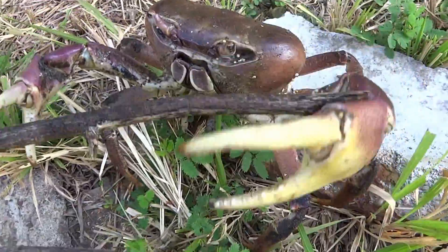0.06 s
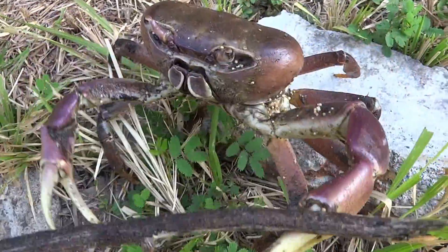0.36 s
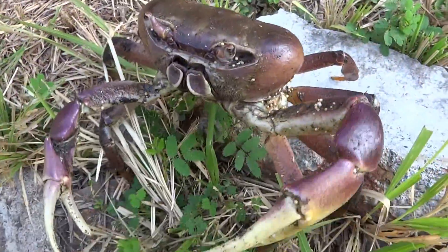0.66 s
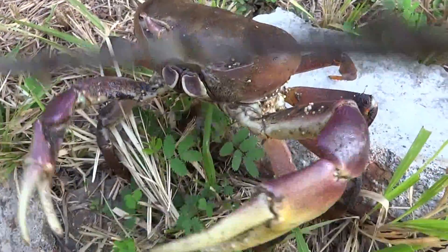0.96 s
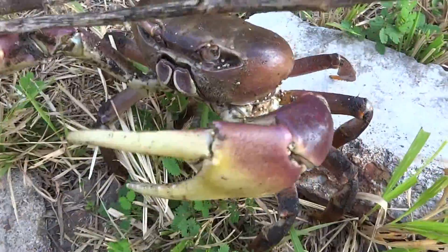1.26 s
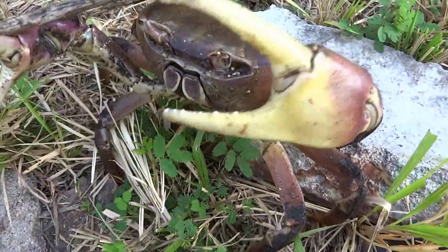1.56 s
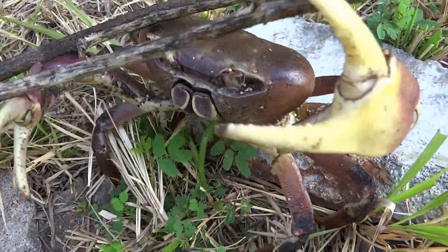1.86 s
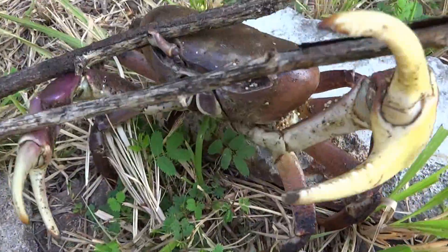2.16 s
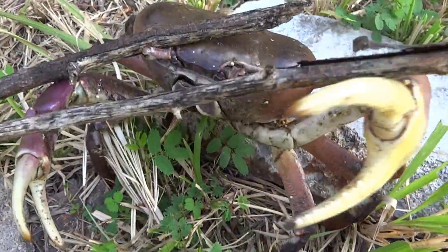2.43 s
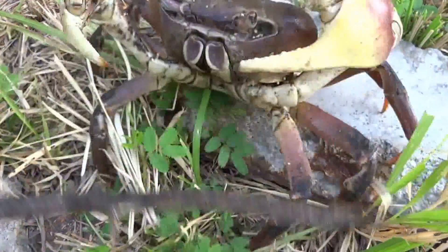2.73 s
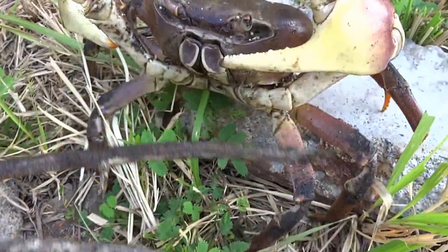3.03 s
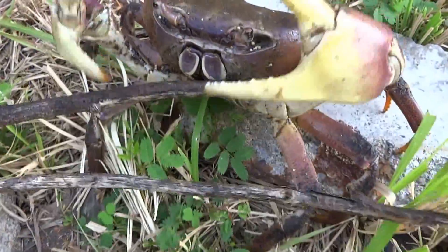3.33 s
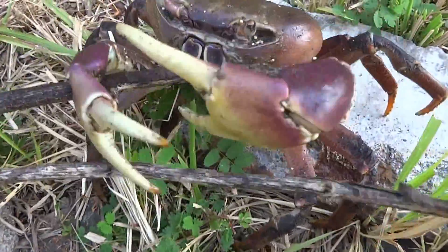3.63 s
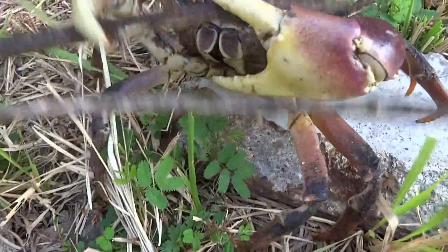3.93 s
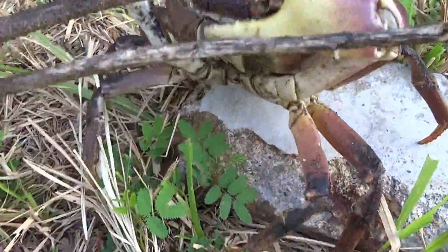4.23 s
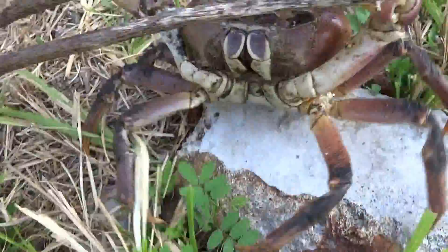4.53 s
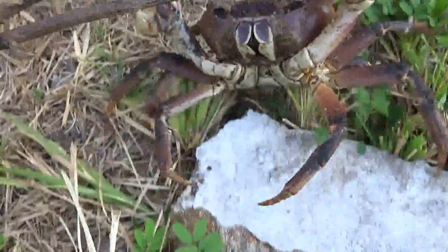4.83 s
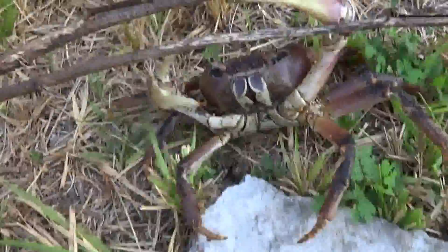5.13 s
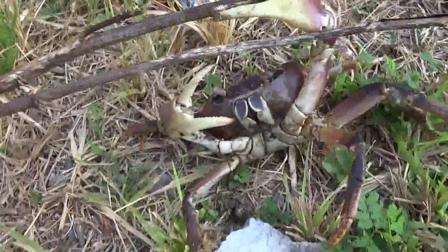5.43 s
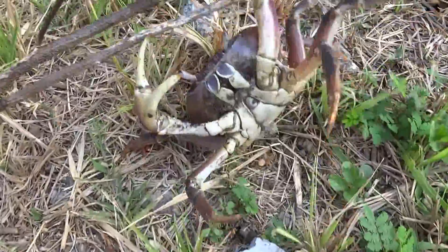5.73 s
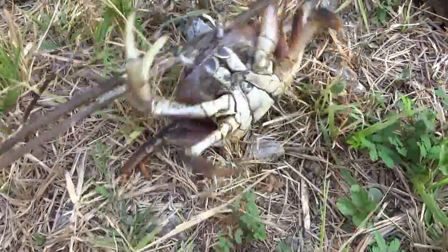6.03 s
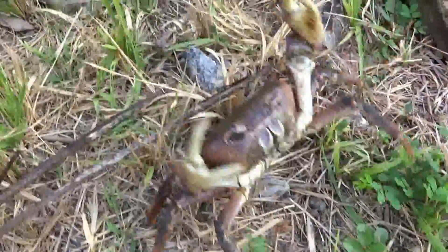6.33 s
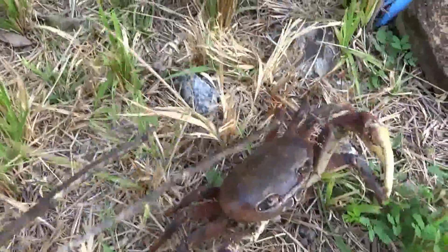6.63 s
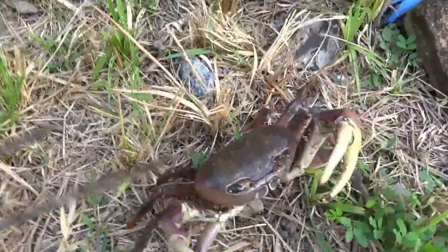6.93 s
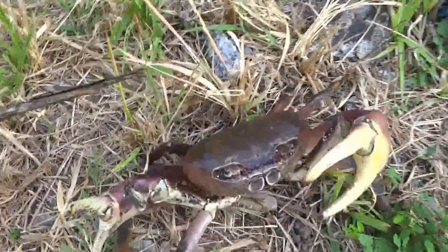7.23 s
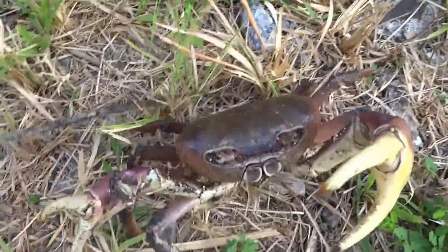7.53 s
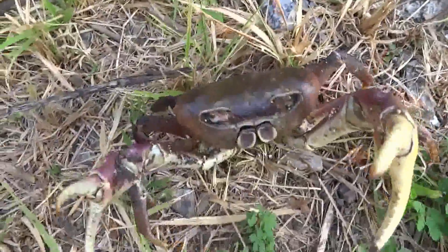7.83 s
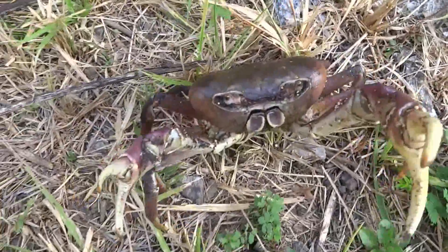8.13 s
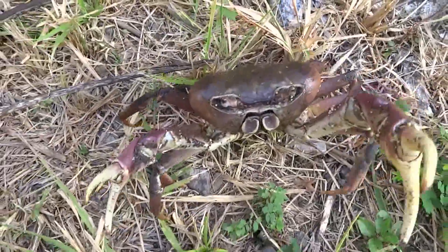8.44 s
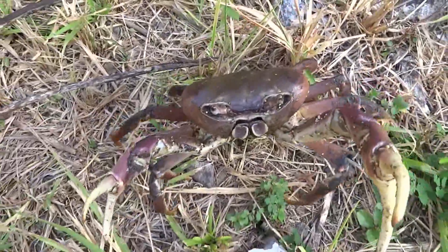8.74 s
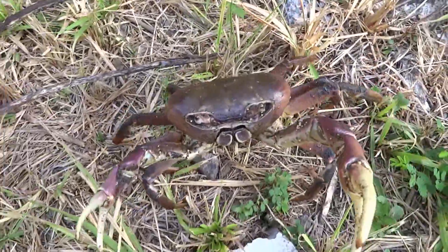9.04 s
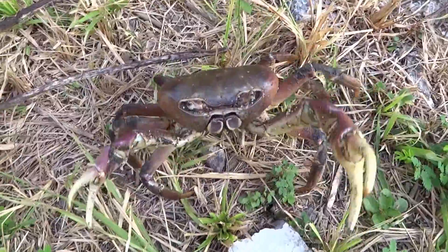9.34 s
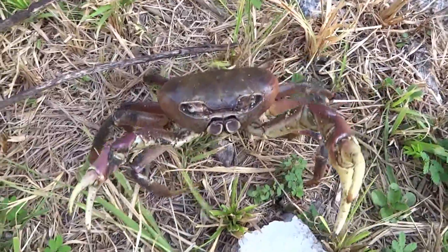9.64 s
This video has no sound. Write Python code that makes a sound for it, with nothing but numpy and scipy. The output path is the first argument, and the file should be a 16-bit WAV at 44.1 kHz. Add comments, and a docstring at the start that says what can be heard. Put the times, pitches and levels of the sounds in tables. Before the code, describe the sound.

Outdoors, close to the microphone, a large crab is prodded with sticks while a machine like a cooling unit hums and blows steadily in the background. At first there are only scattered light ticks and faint rustles. About halfway through, the crab backs away over dry grass with crisp crackles and sharp little snaps. A stick scrapes through the straw, then the rustling thins out, with one sharp clack near the end.

```python
"""Land crab retreating over dry grass

A large land crab, prodded with two sticks, backs away close to a hand-held camera. Straws crackle
under its legs by brittle fracture, a stick drags through the thatch by stick-slip friction, and
stalks, shell and wood snap and tick. Behind it drones a machine like an outdoor cooling unit:
several motors force its casing to vibrate, and its fan drives a turbulent rush of air."""
import sys
import numpy as np
from scipy import signal
from scipy.fft import rfft, irfft, next_fast_len
from scipy.io import wavfile
from scipy.ndimage import map_coordinates

SR = 44100
rng = np.random.default_rng(int(sys.argv[2]) if len(sys.argv) > 2 else 0)


def dump(signal):
    """Clip the signal to [-1, 1] and save it as 16-bit WAV at the path in sys.argv[1]."""
    limited = np.clip(np.atleast_2d(signal).T, -1, 1)
    pcm = np.round(limited * 32767).astype(np.int16)
    wavfile.write(sys.argv[1], SR, pcm)


N = 435708
TIME = np.arange(N) / SR
TOP_HZ = 15900
CATCH_S, SLIDE_OUT_S = 0.039, 0.02  # time constants: a stroke takes hold, and dies away

# The machine as heard from the moving camera. Each row: time in seconds, gain in dB.
MACHINE_GAIN = [(0, 0.5), (2.5, 0.5), (4.6, 0), (5.2, 1.5), (7, 2), (9, 2.5), (9.88, 2.2)]
# Spectrum of breaking straw. Each row: frequency in Hz, relative density in dB.
STRAW_SPECTRUM = [(1000, -28), (3000, -6), (5500, -9.5), (8000, -4), (10500, -1.5), (13500, 0.5),
                  (15000, -7), (16000, -8)]
# Stick or shell sliding on the ground. Each row: start and length in seconds, relative level in dB.
STROKES = [(1.222, 0.068, -54), (2.62, 0.065, -51.5), (3.94, 0.067, -53), (4.78, .14, -52), (5.2, .12, -52),
           (5.63, 0.15, -49), (6.03, 0.084, -47.5), (6.44, 0.076, -51), (6.76, .2, -44.5),
           (6.84, 0.053, -43.5), (6.997, 0.34, -49.5), (7.417, .18, -37.5), (7.616, 0.078, -49)]


def amp(db):
    """Amplitude ratio for a level in decibels."""
    return 10 ** (np.asarray(db) / 20)


def unit(x):
    """Normalisation to rms 1."""
    return x / np.sqrt(np.mean(x ** 2) + 1e-20)


def curve(rows):
    """Linear interpolation of (seconds, value) rows at every sample."""
    return np.interp(TIME, *np.transpose(rows))


def wobble(rate):
    """Smooth random modulation: a spline through rate knots a second."""
    knots = rng.standard_normal(int(N * rate / SR) + 4)
    coarse = map_coordinates(knots, [TIME[::64] * rate])
    return np.interp(TIME, TIME[::64], coarse)


def gain_at(spectrum, hz):
    """Gain of a (Hz, dB) spectrum, interpolated in log frequency."""
    knot_hz, db = np.transpose(spectrum)
    return amp(np.interp(np.log(hz + 1), np.log(knot_hz), db))


def filtered(x, response):
    """Linear filtering: the spectrum of x times a frequency response."""
    size = next_fast_len(N + SR // 2)
    return irfft(rfft(x, size) * response(np.fft.rfftfreq(size, 1 / SR)), size)[..., :N]


def coloured(x, spectrum):
    """Spectral shaping of x, at rms 1."""
    return unit(filtered(x, lambda hz: gain_at(spectrum, hz)))


def stereo(mid, side, side_db):
    """Mid-side stereo: two close microphones hear nearly the same."""
    return mid + amp(side_db) * np.array([side, -side])


def fan_air(air_db, swell_db):
    """Turbulence in the fan and the open yard radiates broadband noise."""
    # Each row: frequency in Hz, relative density in dB.
    air_spectrum = [(25, -23), (65, -12), (160, 3), (300, -2), (450, -2), (620, 8.5), (1150, -5),
                    (2000, 3.5), (3400, -3.5), (5200, -17.5), (8000, -9), (10500, -15.5), (14000, -22.5),
                    (16000, -37)]
    # Difference between the microphones. Each row: frequency in Hz, side gain in dB.
    air_width = [(30, -12), (120, -53), (320, -8), (620, -15), (1200, 2), (2200, -18), (4500, -8),
                 (10000, -15.5)]
    mid, side = coloured(rng.standard_normal((2, N)), air_spectrum)
    side = filtered(side, lambda hz: gain_at(air_width, hz))
    return amp(air_db + swell_db * wobble(3.08) + 0.12 * curve(MACHINE_GAIN)) * stereo(mid, side, 0)


def machine_tones(bass_db, panel_db, whine_db, drift_rad, flutter_db):
    """Panel tones close in frequency beat; the bass reaches everywhere alike."""
    # Each row: frequency in Hz, relative level in dB.
    panel_tones = [(48.4, -77), (90.8, -68), (96.6, -66), (102.3, -72), (134.6, -61), (144.2, -56),
                   (191.8, -61), (198.5, -64), (201.9, -62), (204.5, -55.5), (568.6, -58), (579.8, -47),
                   (604.3, -52), (609, -58), (628.8, -46), (676, -59), (683, -55), (700.6, -56),
                   (749.6, -60), (887.4, -58), (898.3, -61), (932, -61), (1611, -60), (1818.2, -57),
                   (1867.3, -58), (1924.5, -59), (1973, -59), (2045, -57), (2060.5, -55), (2230, -59),
                   (2417.3, -55), (2454, -58), (3197, -63), (3831.6, -60)]
    nearness = amp(curve(MACHINE_GAIN))
    out = np.zeros((2, N))
    for hz, db in panel_tones:
        gain = amp(bass_db) if hz < 300 else nearness * amp(panel_db if hz < 1200 else whine_db)
        drift = drift_rad * np.sqrt(hz / 1000) * wobble(2.5)  # drift_rad holds at 1 kHz
        phase = 2 * np.pi * hz * TIME + drift + rng.uniform(0, 2 * np.pi)
        tone = np.sqrt(2) * gain * amp(db + flutter_db * wobble(3.025)) * np.sin(phase)
        out += stereo(tone, tone * wobble(.7), -26)
    return out


def machine_ducts(flutter_db):
    """Resonance: the fan's air excites two ducts into narrow, hissing rings."""
    # Each row: centre frequency and width in Hz.
    resonances = [(2435, 73), (3900, 240)]
    # Each row: time in seconds, levels of the lower and the upper resonance in dB.
    duct_levels = [(0, -57, -49), (2.2, -49.5, -51.5), (4.6, -51.5, -49), (5.05, -43, -49),
                   (5.6, -45.5, -49.5), (7.3, -46.5, -50), (8.2, -46, -56), (9.88, -47.5, -64)]
    times, *levels = np.transpose(duct_levels)
    out = np.zeros((2, N))
    for (centre, width), db in zip(resonances, levels):
        ring = filtered(rng.standard_normal((2, N)), lambda hz: 1 / (1 + 1j * (hz - centre) / width) ** 3)
        out += amp(np.interp(TIME, times, db) + flutter_db * wobble(20)) * stereo(*unit(ring), -28)
    return out


def machine_buzz(buzz_db, uneven_db, slip):
    """Periodic forcing: each motor rattles once a turn, sending harmonics through the casing."""
    # Each entry: one motor's turns per second.
    shaft_rates = [48.35, 51.1, 60.4]
    # Each row: frequency in Hz, relative response in dB.
    casing_response = [(400, -52), (520, -4), (640, -9.5), (760, -8.5), (900, 2), (970, -14.5), (1350, -16),
                       (1580, -1.5), (2000, -1), (2500, 0.5), (2850, -6.5), (3500, -14.5), (4000, -11.5),
                       (4400, -19.5), (5500, -31)]
    size = 4096  # points per turn
    orders = np.arange(size // 2 + 1)
    rattle = np.zeros((2, N))
    for hz in shaft_rates:
        unevenness = amp(uneven_db * rng.standard_normal((2, len(orders))))
        strength = gain_at(casing_response, orders * hz) * unevenness
        cycles = irfft(strength * np.exp(2j * np.pi * rng.random(strength.shape)))
        turn = np.cumsum(hz * (1 + slip * wobble(4))) / SR % 1
        rattle += [np.interp(turn * size, np.arange(size), cycle) for cycle in cycles]
    return amp(buzz_db + curve(MACHINE_GAIN)) * stereo(unit(rattle[0]), unit(rattle[1]), -14)


def fractures(rate, spread_db):
    """A Poisson process of tiny breaks, rate a second, most weak and a few strong."""
    size = amp(spread_db * np.clip(rng.standard_normal(N), -2, 2))
    return unit((rng.random(N) < rate / SR) * size * rng.standard_normal(N))


def crackle(rate, spread_db, decay_s, spectrum, side_db):
    """Convolution: each of eight fibres answers its own fractures with a damped shake."""
    t = np.arange(SR // 200) / SR
    fibres = []
    for _ in range(8):
        breaks = fractures(rate, spread_db)
        shake = unit(rng.standard_normal(len(t)) * np.exp(-t / decay_s))
        fibres.append(signal.oaconvolve(breaks, shake)[:N])
    side = sum(fibres[::2]) - sum(fibres[1::2])
    return stereo(*coloured(np.array([sum(fibres), side]), spectrum), side_db)


def stroke(start, length, db, attack_s=CATCH_S, release_s=SLIDE_OUT_S):
    """Envelope of a slide: exponential rise, plateau, exponential decay."""
    outside = np.maximum(start - TIME, 0) / attack_s + np.maximum(TIME - start - length, 0) / release_s
    return amp(db) * np.exp(-np.minimum(outside, 20))


def drag(drag_db, judder_db, creep_db):
    """Stick-slip friction of wood and shell in the thatch makes a dense, dull crackle."""
    # The crab's body trails along: start and length in seconds, relative level in dB.
    retreat = (4.45, 3.1, -53.5)
    # Each row: frequency in Hz, relative density in dB.
    thatch_spectrum = [(150, -27), (500, -13), (950, -6), (1500, -2), (2300, -2.5), (3200, -8.5),
                       (4600, -9.5), (7000, -14.5), (11000, -16.5), (16000, -25)]
    power = amp(creep_db) ** 2 + stroke(*retreat, attack_s=0.4, release_s=0.4) ** 2
    power += sum(stroke(*row) ** 2 for row in STROKES)
    envelope = np.sqrt(power) * amp(drag_db + judder_db * wobble(130))
    return envelope * crackle(800, spread_db=1.4, decay_s=.00075, spectrum=thatch_spectrum, side_db=-15.5)


def rasp(rasp_db, judder_db):
    """Frictional chatter excites the stick's resonances in the hardest stroke."""
    # Each row: frequency in Hz, relative density in dB.
    wood_spectrum = [(700, -30), (1100, -8), (1500, -3), (1900, -7), (2800, -22), (5000, -17), (9000, -40)]
    start, length, _ = max(STROKES, key=lambda row: row[2])
    wood = crackle(60, spread_db=2, decay_s=.001, spectrum=wood_spectrum, side_db=-15)
    return stroke(start, length, rasp_db + judder_db * wobble(45)) * wood


def bursts(rows, gain_db, width_oct, body_db, shiver_db=-19, shiver_s=.0065):
    """Impulse response: a noise burst round the object's own pitch, then a shiver of nearby straws."""
    out = np.zeros((2, N + SR))
    t = np.arange(SR // 20) / SR
    hz = np.fft.rfftfreq(len(t), 1 / SR)
    for start, db, centre_hz, rise_s in rows:
        octaves = np.log2((hz + 1) / centre_hz)
        flexing = amp(body_db) * np.exp(-(octaves + 2) ** 2)  # the whole body, two octaves lower
        colour = (np.exp(-.5 * (octaves / width_oct) ** 2) + flexing) * (hz < TOP_HZ)
        grain = unit(irfft(colour * np.exp(2j * np.pi * rng.random(len(hz))), len(t)))
        age = t / rise_s
        shiver = amp(shiver_db) * (1 - np.exp(-age)) * np.exp(-t / shiver_s)
        envelope = age * np.exp(1 - age) + shiver
        burst = grain * envelope * np.linalg.norm(envelope) / np.linalg.norm(grain * envelope)
        pair = stereo(burst, burst * rng.normal(), -20)
        out[:, round(start * SR):][:, :len(t)] += amp(db + gain_db) * pair
    return out[:, :N]


def knocks():
    """Heavily damped impacts of the sticks on the crab and the ground."""
    # Each row: start in seconds, crest level in dB, centre frequency in Hz, rise time in seconds.
    impacts = [(1.1233, -28, 2300, .0006), (1.3828, -32, 890, 0.00088), (2.6138, -37, 1000, .0007),
               (2.6138, -26, 2300, .00085), (3.9833, -37, 1200, 0.00064), (4.8966, -28, 1800, 0.00063),
               (5.2166, -27, 4100, 0.00054), (6.716, -22.5, 1640, .0012), (7.213, -31, 2400, .0008),
               (7.4069, -28, 4200, .0005), (7.537, -34, 4500, 0.0033), (7.5807, -33, 3900, 0.0033),
               (8.6511, -27, 5500, .0006), (8.6552, -24, 5800, 0.00054), (8.8756, -35, 4300, .0007)]
    return bursts(impacts, gain_db=0, width_oct=0.38, body_db=-14)


def clacks(clack_db, attack_s):
    """Modal ringing of a dry stick struck on shell, damped by the hand."""
    # Each row: start in seconds, relative level in dB.
    strikes = [(1.1229, -22), (2.0966, -31), (5.3024, -26), (5.438, -30), (7.4458, -23), (8.4618, -35),
               (8.6552, -13)]
    # Each row: frequency in Hz, relative level in dB, time to fall 60 dB in seconds.
    stick_modes = [(2900, -7, 0.01), (3200, -3, 0.0084), (4280, -4.5, 0.0088), (5760, 1, 0.007),
                   (6070, -11, .008), (6970, -9.5, 0.017), (9700, -11, 0.0044), (12700, -13, .004)]
    out = np.zeros(N + SR)
    t = np.arange(SR // 30) / SR
    for start, db in strikes:
        ring = np.zeros(len(t))
        for hz, mode_db, t60 in stick_modes:
            decay = amp(mode_db + rng.normal() - 60 * t / t60)
            ring += decay * np.sin(2 * np.pi * (hz * t + rng.random()))
        out[round(start * SR):][:len(t)] += amp(db + clack_db) * ring * (1 - np.exp(-t / attack_s))
    return out[:N]


def stalk_snaps(centre_hz, scatter_oct):
    """Brittle fracture of whole stalks, all at about the same pitch."""
    # Each row: start in seconds, relative crest level in dB, rise time in seconds.
    snaps = [(.1703, -32, .0003), (.2825, -39, .0004), (.613, -38, .0004), (.7376, -31, .0003),
             (1.1233, -24.5, 0.00035), (1.47, -38, .0003), (1.644, -37, .0003), (1.667, -37, .0004),
             (1.768, -35, .0004), (2.0418, -37, .0004), (2.557, -33.5, 0.0027), (2.6138, -35, .0005),
             (3.4103, -33, .0004), (4.1496, -26, .0004), (4.5065, -30, .0005), (4.5871, -28, .0004),
             (4.7202, -25, .0004), (4.7734, -27, .0005), (4.851, -22, .0004), (4.8806, -26, 0.0034),
             (4.8893, -13.5, 0.00026), (4.8962, -15.5, .0005), (4.9203, -27, .0006), (5.2166, -22, .0004),
             (5.228, -28, .0004), (5.2617, -32, .0015), (5.273, -26, 0.0014), (5.3024, -27, .0004),
             (5.3396, -24.5, 0.0019), (5.347, -29, .0009), (5.419, -32, 0.00056), (5.438, -32, .0004),
             (5.7593, -30, .0015), (6.0428, -18.5, 0.001), (6.142, -27, 0.00099), (6.49, -33, 0.00046),
             (7.088, -32, .0005), (7.163, -38, 0.00059), (8.4618, -29.5, .0004), (8.5598, -31, .0004),
             (8.6553, -25, .0006), (8.875, -32, 0.00066), (8.9514, -33, .0004), (9.3205, -37, .0006)]
    rows = [(start, db, centre_hz * 2 ** (scatter_oct * rng.normal()), rise) for start, db, rise in snaps]
    return bursts(rows, gain_db=-2, width_oct=0.45, body_db=-6.5)


def crush_level(load_share, range_db):
    """Incoherent powers add: each step swells by range_db under load and fades as the weight lifts."""
    # A leg or claw leans. Each row: time of full weight in seconds, level in dB, length in seconds.
    steps = [(.41, -47, .12), (1.253, -44, 0.13), (2.12, -47, .12), (2.67, -40, 0.33), (3.97, -34, 0.13),
             (4.53, -41.5, 0.43), (4.82, -33, 0.25), (4.896, -29.5, 0.25), (5.172, -43, .16),
             (5.258, -32, 0.26), (5.614, -45, .2), (5.77, -40.5, .22), (6.05, -29.5, 0.082),
             (6.125, -30, .2), (6.23, -36.5, 0.18), (6.488, -40.5, 0.31), (6.806, -43, 0.6),
             (7.4, -41, 0.45), (7.51, -36, 0.33), (9.32, -45, .2), (9.71, -46, 0.39)]
    # Restless shifting between steps. Each row: time in seconds, level in dB.
    fidget = [(0, -60), (1.9, -54.5), (2.35, -65), (3.1, -65), (3.8, -50.5), (4.6, -47.5), (6.3, -51),
              (7.2, -52), (8, -60), (8.6, -55), (9.88, -63)]
    power = amp(curve(fidget)) ** 2
    for peak_s, db, length in steps:
        from_peak = np.maximum((peak_s - TIME) / load_share, (TIME - peak_s) / (1 - load_share)) / length
        power += amp(db - range_db * np.minimum(from_peak, 10)) ** 2
    return 10 * np.log10(power)


def straw_ticks(crush_db, tick_db, follow):
    """Sparse fractures of single fibres stand out of the rustle, even under a light step."""
    ticks = crackle(9, spread_db=1, decay_s=.0002, spectrum=STRAW_SPECTRUM, side_db=-18)
    return amp(tick_db + follow * (crush_db + 40)) * ticks


def straw_crush(crush_db, straw_db, clump_db):
    """Acoustic emission: more weight on the grass breaks more fibres, in short clumps."""
    rate = 230 * amp(.6 * (crush_db + 46.5))
    clumps = amp(clump_db * wobble(110))
    fibres = crackle(rate, spread_db=2, decay_s=.0005, spectrum=STRAW_SPECTRUM, side_db=-22)
    fibres /= np.sqrt(rate / rate.mean())  # the rate sets density, not loudness
    return amp(crush_db + straw_db) * clumps * fibres


def scene():
    """Superposition of the crab in front and the machine a little to the right."""
    machine = machine_tones(bass_db=-0.5, panel_db=-0.5, whine_db=0, drift_rad=0.86, flutter_db=1.87)
    machine += machine_ducts(flutter_db=1.5) + machine_buzz(buzz_db=-45, uneven_db=1, slip=0.000709)
    crush_db = crush_level(load_share=0.56, range_db=15.5)
    grass = straw_crush(crush_db, straw_db=-0.8, clump_db=0.95)
    grass += straw_ticks(crush_db, tick_db=-60.5, follow=0.42)
    grass += drag(drag_db=3, judder_db=2, creep_db=-74) + rasp(rasp_db=-40, judder_db=3)
    hits = stalk_snaps(centre_hz=10800, scatter_oct=0.048) + knocks()
    hits += clacks(clack_db=-0.5, attack_s=0.00033)
    return machine * amp([[-.4], [.4]]) + fan_air(air_db=-42, swell_db=1.56) + grass + hits


def record(dry):
    """Band limiting: the camera passes nothing above TOP_HZ."""
    return filtered(dry, lambda hz: hz < TOP_HZ)


dry = scene()
out = record(dry)
dump(out)
```